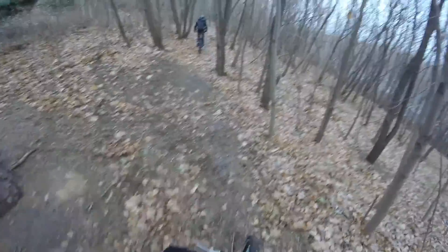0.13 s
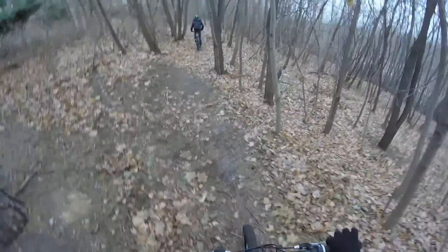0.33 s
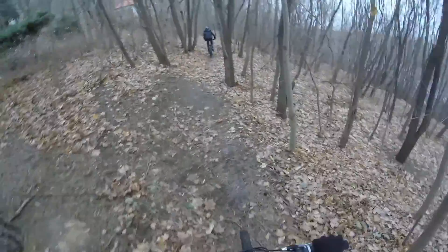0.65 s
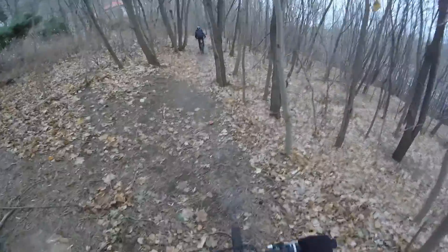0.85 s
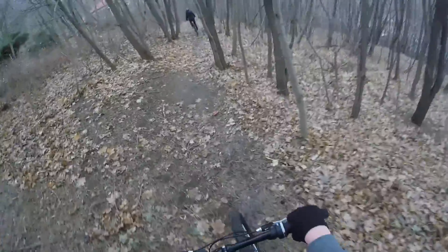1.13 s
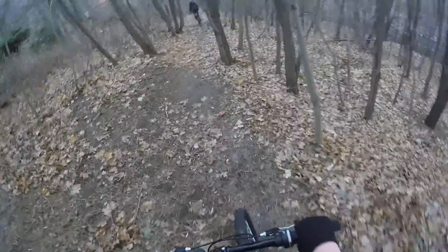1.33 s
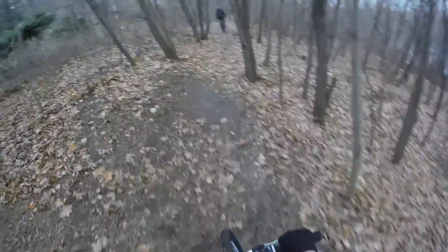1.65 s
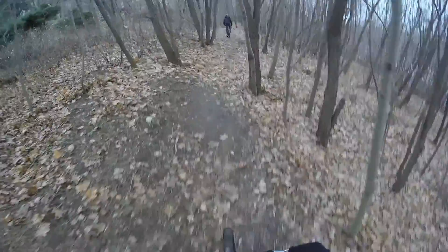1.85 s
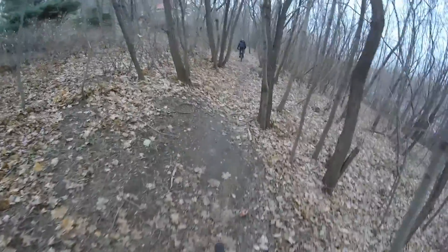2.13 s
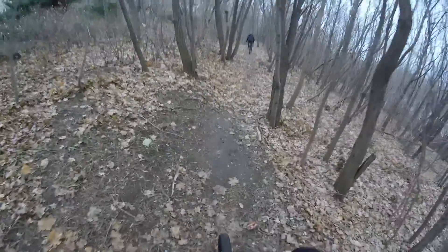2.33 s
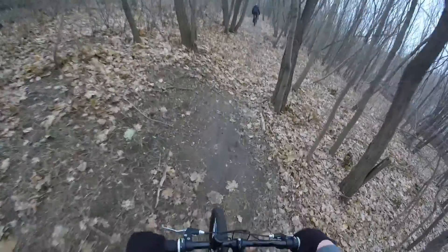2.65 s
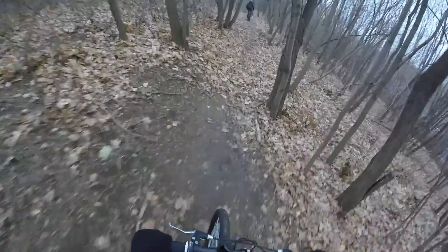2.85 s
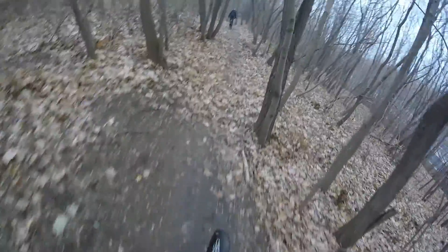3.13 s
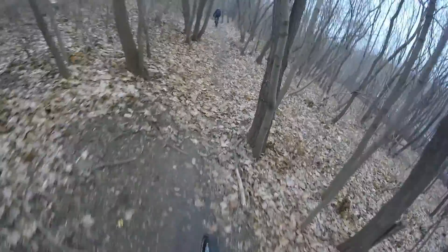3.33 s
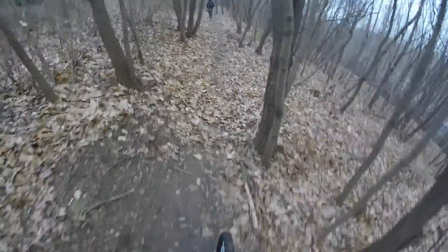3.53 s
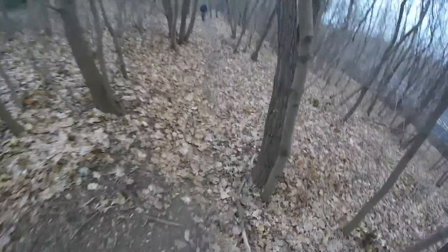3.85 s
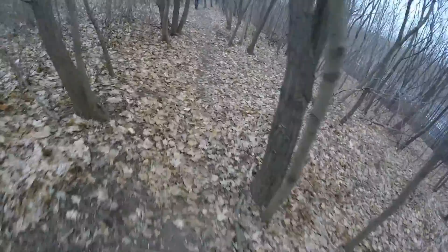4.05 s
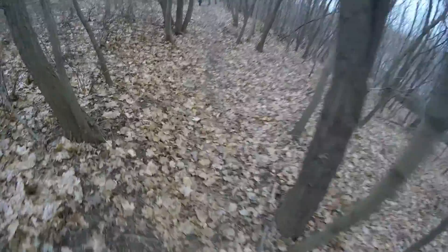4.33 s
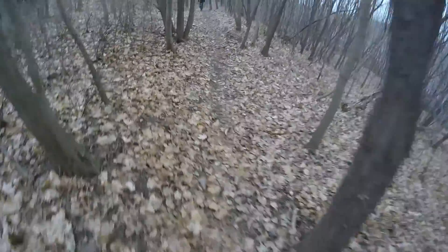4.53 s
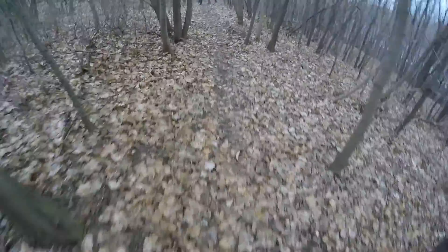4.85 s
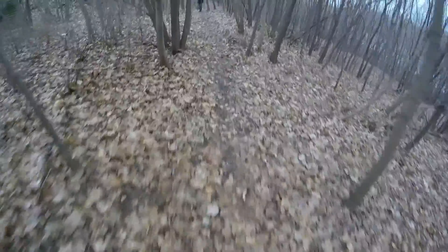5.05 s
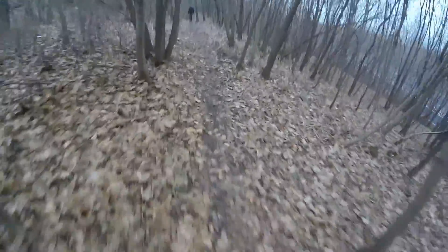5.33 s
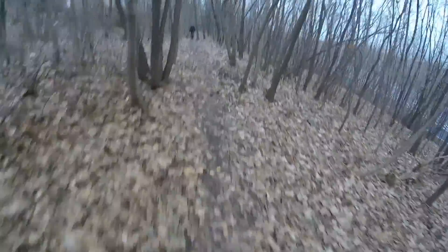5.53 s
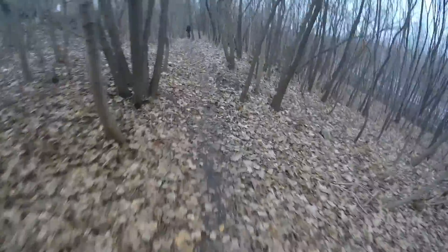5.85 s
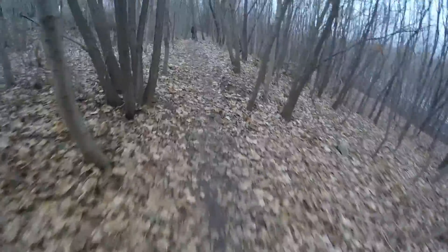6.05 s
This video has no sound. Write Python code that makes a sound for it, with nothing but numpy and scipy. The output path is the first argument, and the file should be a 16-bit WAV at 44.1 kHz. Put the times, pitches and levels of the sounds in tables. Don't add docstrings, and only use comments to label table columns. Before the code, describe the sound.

From inside a plastic camera case, a bike rumbles over forest ground, with buffeting wind, root thuds, small mount squeaks, and cracks near the start and five seconds.

```python
import sys
import numpy as np
from scipy import signal
from scipy.fft import rfft, irfft, next_fast_len
from scipy.io import wavfile
from scipy.ndimage import uniform_filter1d

SR = 44100
rng = np.random.default_rng(int(sys.argv[2]) if len(sys.argv) > 2 else 0)


def inscribe(sig):
    pcm = np.round(np.clip(np.atleast_2d(sig).T, -1, 1) * 32767)
    wavfile.write(sys.argv[1], SR, pcm.astype(np.int16))


def boost_factor(decibels):
    exponent = np.asarray(decibels, float) / 20
    return 10 ** exponent


N = 272979
T = np.arange(N) / SR

# pitch_hz, width_hz, level_db
CASE_RINGS = [(505, 270, -28.5), (1167, 35, -10.5), (1527, 140, -4.5), (1658, 98, -0.5), (2244, 97, -3.5),
              (2591, 217, -0.5), (2964, 180, -11.5), (3780, 300, -25), (6010, 1160, -27.5),
              (6510, 870, -30), (7890, 120, -26), (9500, 480, -34.5), (10400, 580, -35), (13900, 1300, -40)]
# freq_hz, level_db
CASE_WALL = [(100, -33.5), (700, -35.5), (2000, -10.5), (3500, -26.5), (5000, -31.5), (8500, -37.5),
             (12000, -67), (16000, -90)]

# centre_s, level_db
GUSTS = [(0.0, -48), (0.28, -46.5), (0.55, -46), (0.72, -45), (1.05, -62), (1.38, -52.5), (1.58, -59),
         (1.78, -52), (2.12, -56), (2.359, -47), (2.63, -46.5), (2.97, -46.5), (3.17, -45), (3.38, -49.5),
         (3.64, -44.5), (3.93, -48), (4.1, -47.5), (4.28, -51), (4.46, -48.5), (4.75, -52), (5.02, -46),
         (5.2, -40.5), (5.31, -41.5), (5.58, -42.5), (5.96, -46), (6.1, -47.5)]
# freq_hz, level_db
BUFFET_COLOUR = [(4, 5), (15, 9), (25, -4.5), (33, -6), (42, -4.5), (55, -9.5), (100, -56), (1000, -98)]
# freq_hz, level_db
DRUM_COLOUR = [(40, -23), (60, -1.5), (80, -1.5), (105, -4.5), (170, -3.5), (230, -16), (400, -31.5),
               (900, -53), (8000, -67)]
# freq_hz, level_db
AIR_COLOUR = [(120, -34.5), (200, -4), (381, -5), (870, -10.5), (1360, -6), (1520, 0.5), (1880, -8),
              (2640, -9.5), (3460, -18.5), (14500, -36)]

# start_s, length_s, drum_db, chain_db
PUSHES = [
    (-0.1, 0.17, -57, -81),
    (0.548, 0.78, -53.5, -93),
    (2.02, 0.68, -52, -82.5),
    (3.38, 0.67, -55, -103),
    (4.725, 0.78, -58, -87),
    (6.006, 0.5, -55.5, -93),
]

# start_s, level_db, pitch_hz
BUMPS = [(0.02, -40.5, 97), (0.265, -50, 60), (0.6, -32, 83.6), (1.918, -48.5, 79), (2.67, -37, 62.7),
         (3.059, -37.5, 76.1), (3.419, -52, 94.5), (3.801, -39, 80.8), (4.184, -38.5, 81.5),
         (4.751, -50, 171.8), (5.298, -39.5, 85.8), (6.036, -37, 76.4)]
# start_s, peak_db, pitch_hz
TICKS = [
    (1.4087, -57, 6350),
    (1.513, -58, 5940),
    (2.4703, -56, 6300),
    (3.4955, -62, 6170),
    (5.4301, -54.5, 6040),
    (2.0383, -62, 8900),
    (3.4116, -61, 8380),
]

# start_s, peak_db, low_ring_db, bright_db, swell_ms
KNOCKS = [
    (0.4669, -22.5, -21, -13, 1.32),
    (0.4736, -42, -18, -10, 2.5),
    (4.97, -40.5, -3, -22, 2.24),
    (5.008, -23, 3.5, -15.5, 1.96),
    (5.0119, -27.5, 4.5, -25, 1.94),
    (5.0428, -44.5, 6, -15, 2.5),
    (5.6407, -47, -14, -30, 1.8),
]
# pitch_hz, level_db
KNOCK_TONES = [
    [(2170, -8), (2560, -1.5), (2980, -4), (3300, -14.5), (3900, -17)],
    [(330, -21.5), (580, -26.5), (1120, -14.5), (1670, -1.5), (1910, -6.5)],
    [(5810, -1.5), (6170, 1.5), (7950, -37.5), (10100, -16), (14300, -17)],
]
# freq_hz, level_db
RATTLE_COLOUR = [(150, -17), (800, -1.5), (2500, 10.5), (5000, -3), (8000, -4.5), (12000, -17.5),
                 (16000, -14)]

# start_s, length_s, pressure_db, start_rate_hz, end_rate_hz
SLIPS = [(1.166, 0.028, -55.5, 444.7, 446), (1.207, 0.034, -48, 428.6, 444.3),
         (1.247, .02, -42, 536, 539.3), (1.258, .028, -41.5, 517, 514), (1.295, .021, -43.5, 518, 503),
         (1.323, 0.037, -38, 529, 515), (1.355, 0.015, -37.5, 534, 536), (1.375, 0.019, -53, 538.4, 530.8),
         (2.619, 0.017, -53.5, 504, 518), (2.643, 0.019, -42.5, 514.8, 512.8),
         (2.672, 0.038, -40, 519, 520.3), (2.698, .022, -37, 523, 530), (2.72, 0.017, -42.5, 526, 537),
         (2.729, 0.019, -47, 556.4, 572), (2.76, .02, -56.5, 530, 534), (3.835, 0.011, -54, 505, 493),
         (3.864, 0.0082, -51, 506, 495.4), (3.888, 0.041, -46.5, 506.7, 502),
         (3.944, 0.032, -49, 515, 531.6), (3.963, 0.047, -49.5, 548, 560), (4.943, 0.017, -51, 502, 515),
         (4.962, 0.05, -55, 568, 580)]
# pitch_hz, width_hz, level_db
SLIP_RINGS = [(1524, 350, -3), (2622, 134, -2)]
# freq_hz, level_db
SLIP_COLOUR = [(700, 9), (1050, -21), (1300, -3), (1600, -1.5), (1900, -11), (2150, -4.5), (2600, 1),
               (3100, -7), (3700, -15.5), (4500, -30)]
# multiple, level_db
SQUEAL_PARTIALS = [(4, -4), (4.2, -6), (5, 2), (6, -36), (7, -7), (8, -4), (9, -14), (10, -11), (11, -8),
                   (12, -19)]
# freq_hz, level_db
SCRAPE_COLOUR = [(3000, 4.5), (4500, -8), (7000, -6), (10000, -16), (12000, -15), (15600, -11),
                 (15900, -40)]

# time_s, level_db
TREAD_WEIGHT = [(0.0, -54), (0.5, -59.5), (0.62, -53), (1.0, -58), (1.45, -59), (1.69, -53), (1.97, -57),
                (2.08, -50.5), (2.85, -66), (3.08, -60), (3.3, -67.5), (3.5, -57), (4.08, -71.5),
                (4.3, -58), (4.6, -63), (5.1, -54.5), (5.8, -72), (6.19, -55)]
# entry_s, deepest_s, exit_s, depth_db
LEAF_DRIFTS = [
    (0.75, 0.977, 1.6, -82),
    (2.848, 2.995, 3, -85),
    (4.558, 4.7, 5.4, -70.5),
    (4.693, 5.053, 5.4, -64.5),
    (5.15, 5.42, 5.585, -70),
    (5.828, 5.91, 5.9, -81.5),
]
# pitch_hz, width_hz, level_db
HUB_BANDS = [(5550, 200, 0), (9480, 220, -4), (10070, 180, -5), (13400, 180, -9), (13950, 180, -9),
             (15080, 120, -12)]

# low_hz, high_hz, open_db (over the usual level of the band)
TOP_BANDS = [(14500, 15150, -1), (15150, 17500, 6)]


def unit(x):
    return x / np.sqrt(np.mean(x ** 2))


def noise():
    return rng.standard_normal(N)


def high(x, hz):
    return signal.sosfilt(signal.butter(2, hz, "high", fs=SR, output="sos"), x)


def shape(points, hz):
    f, db = np.transpose(points)
    return boost_factor(np.interp(np.log(hz + 1), np.log(f), db))


def peaks(modes, hz):
    return np.sqrt(sum(boost_factor(db) ** 2 / (1 + (2 * (hz - f) / w) ** 2) ** 2 for f, w, db in modes))


def colour(x, gain):
    size = 2 ** 15
    cep = irfft(np.log(gain(np.fft.rfftfreq(size, 1 / SR)) + 1e-9), size)
    cep[1:size // 2] *= 2
    cep[size // 2 + 1:] = 0
    return signal.fftconvolve(x, irfft(np.exp(rfft(cep)), size))[:N]


def walk(rate):
    k = int(SR / rate)
    held = np.repeat(rng.standard_normal(N // 50), k)[:N]
    return unit(uniform_filter1d(uniform_filter1d(held, k), k))


def rough(rate):
    return walk(rate) + 1j * walk(rate)


def crackle(rate, spread_db):
    snaps = (rng.random(N) < rate / SR) * boost_factor(spread_db * rng.exponential(size=N))
    smeared = signal.lfilter([1], [1, -np.exp(-1 / (0.0019 * SR))], snaps)
    return unit(smeared * noise())


def case_gain(hz):
    return np.hypot(peaks(CASE_RINGS, hz), shape(CASE_WALL, hz))


def pushes(column, sag_db_s, rest_db):
    attack_s, release_s = 0.044, 0.079
    power = boost_factor(rest_db) ** 2
    for row in np.array(PUSHES):
        age = T - row[0]
        gate = np.clip(np.minimum(age / attack_s, (row[1] - age) / release_s), 0, 1)
        power = power + (gate * boost_factor(row[column] - sag_db_s * np.clip(age, 0, 1))) ** 2
    return np.sqrt(power)


def wind():
    gust_s, lull_db, air_db = 0.076, -60, -59
    gust_power = sum(boost_factor(db) ** 2 * np.exp(-((T - s) / gust_s) ** 2) for s, db in GUSTS)
    gusts = np.sqrt(boost_factor(lull_db) ** 2 + gust_power)
    buffet = unit(colour(noise(), lambda hz: shape(BUFFET_COLOUR, hz))) * gusts
    drum = unit(colour(noise(), lambda hz: shape(DRUM_COLOUR, hz))) * boost_factor(1.9 * walk(14))
    drum = drum * pushes(column=2, sag_db_s=9, rest_db=-63)
    air = unit(colour(noise(), lambda hz: shape(AIR_COLOUR, hz))) * boost_factor(air_db + 0.6 * walk(6))
    return buffet + drum + air


def bumps():
    out = np.zeros(N)
    for s, db, hz in BUMPS:
        age = np.maximum(T - s, 0)
        swell = np.exp(-age / 0.021) * (1 - np.exp(-age / 0.011))
        out += boost_factor(db - 1.0) * np.sin(2 * np.pi * hz * age) * swell
    return out


def ticks():
    out, grit = np.zeros(N), high(noise(), 5000)
    for s, db, hz in TICKS:
        age = np.maximum(T - s, 0)
        ping = np.sin(2 * np.pi * hz * age) + 0.4 * grit
        out += (T > s) * boost_factor(db) * np.exp(-age / 0.0014) * ping
    return out


def knocks():
    tones, rattle = np.zeros(N), np.zeros(N)
    chance = rng.random((len(KNOCKS), 3, 5, 2))
    for (s, db, low_db, bright_db, ms), rows in zip(KNOCKS, chance):
        age = np.maximum(T - s, 0) * 1000 / max(ms, 0.5)
        near = (age > 0) & (age < 8)
        swell = age[near] ** 1.63 * np.exp(1 - age[near] ** 1.4)
        for group, group_db, row in zip(KNOCK_TONES, (0, low_db, bright_db), rows):
            for (hz, tone_db), (detune, turn) in zip(group, row):
                cycles = hz * (1 + 0.024 * (detune - 0.5)) * (T[near] - s) + 0.35 * turn
                tones[near] += boost_factor(db - 4.5 + tone_db + group_db) * swell * np.sin(2 * np.pi * cycles)
        rattle += boost_factor(db) * np.minimum(age * 3, 1) * (np.exp(-age / 2.12) + 0.096 * np.exp(-age / 6))
    rattle *= noise()
    cased = boost_factor(-3) * colour(rattle, case_gain)
    direct = boost_factor(-12) * colour(rattle, lambda hz: shape(RATTLE_COLOUR, hz))
    return tones + cased + direct


def pressure():
    attack_s, release_s, overlap_s = 0.01, 0.0089, 0.008
    growth_db = 1
    s, length, db, start_hz, end_hz = np.transpose(SLIPS)
    times = np.maximum.accumulate(np.ravel([s, s + length], "F"))
    hz = np.interp(T, times, np.ravel([start_hz, end_hz], "F"))
    press = np.zeros(N)
    for t0, t1, gain in zip(s - overlap_s, s + length + overlap_s, boost_factor(db + 45)):
        growth = boost_factor(growth_db * np.clip((T - t1) / (t1 - t0), -1, 0))
        gate = np.clip(np.minimum((T - t0) / attack_s, (t1 - T) / release_s), 0, 1)
        press = np.maximum(press, gain * growth * gate)
    return hz, press


def squeal(clean):
    turn = 2 * np.pi * np.cumsum(1297 * (1 + 0.00264 * walk(60))) / SR
    partials = (boost_factor(db) * np.real((clean + rough(300)) * np.exp(1j * k * turn))
                for k, db in SQUEAL_PARTIALS)
    return unit(sum(partials))


def mount():
    frame_db, frame_power, squeal_db, squeal_power = -60, 0.45, -66, 1.33
    off_ring_db = -7
    hz, press = pressure()
    jitter = 0.00706 * walk(450) / np.clip(press, 0.5, 2) ** 0.44
    phase = 2 * np.pi * np.cumsum(hz * (1 + 0.002 * walk(70) + jitter)) / SR
    slips = boost_factor(frame_db + 3.5) * press ** frame_power * np.cos(phase)
    for k in range(2, 9):
        ring = press * np.hypot(peaks(SLIP_RINGS, k * hz), boost_factor(off_ring_db))
        tint = shape(SLIP_COLOUR, k * hz)
        steady = 0.15 + 0.85 * tint ** 0.8
        tone = np.real((steady + 0.29 * rough(190)) * np.exp(1j * k * phase))
        slips += boost_factor(-42.5) * ring * tint * tone
    slips *= boost_factor(0.99 * walk(110))
    slips = 0.89 * slips + boost_factor(-0.5) * colour(slips, case_gain)
    scrape = unit(colour(noise(), lambda hz: shape(SCRAPE_COLOUR, hz)))
    rub = boost_factor(-1.0) * squeal(clean=1.2) + boost_factor(1.0) * scrape
    return slips + boost_factor(squeal_db) * press ** squeal_power * rub


def chain_and_hub():
    hub = unit(colour(noise(), lambda hz: peaks(HUB_BANDS, hz)))
    return hub * boost_factor(7.5) * pushes(column=3, sag_db_s=27, rest_db=-97)


def leaves():
    thin_db = -96.5
    drifts = [boost_factor(db) * np.interp(T, sorted([t0, t1, t2]), [0, 1, 0]) for t0, t1, t2, db in LEAF_DRIFTS]
    return np.sqrt(boost_factor(thin_db) ** 2 + np.sum(np.square(drifts), axis=0))


def tyres():
    split_hz = 1950
    weight_db, depth = np.interp(T, *np.transpose(TREAD_WEIGHT)), leaves()
    leaf_gain = boost_factor(-61) * (depth * boost_factor(83.5)) ** 0.48
    upper_gain = np.hypot(boost_factor(weight_db - 6), leaf_gain)
    crisp_gain = np.hypot(boost_factor(weight_db - 39), depth)
    tread = crackle(5000, spread_db=-1.5)
    low = unit(colour(tread * boost_factor(2.0 * walk(18)),
                      lambda hz: case_gain(hz) / np.hypot(1, (hz / split_hz) ** 6)))
    upper = unit(colour(tread * boost_factor(1.45 * walk(16)),
                        lambda hz: case_gain(hz) / np.hypot(1, (split_hz / (hz + 1)) ** 6)))
    leaf_snaps = high(crackle(4000, spread_db=1.0), 3960)
    crisp = unit(colour(leaf_snaps * boost_factor(1.5 * walk(14)), case_gain))
    return low * boost_factor(weight_db + 2.0) + upper * upper_gain + crisp * crisp_gain


def scene():
    return (wind() + bumps() + ticks() + knocks() + mount() + chain_and_hub() + tyres())[None]


def top_cut(x):
    return signal.sosfilt(signal.butter(12, 16530, fs=SR, output="sos"), x)


def record(dry):
    size = next_fast_len(N)
    spectrum, hz = rfft(dry, size), np.fft.rfftfreq(size, 1 / SR)
    kept = dry
    for low_hz, high_hz, open_db in TOP_BANDS:
        top = irfft(spectrum * (hz > low_hz) * (hz <= high_hz), size)[:, :N]
        power = uniform_filter1d(top ** 2, size=2048)
        shut = power < boost_factor(open_db) ** 2 * np.median(power)
        kept = kept - top * uniform_filter1d(1.0 * shut, size=512)
    return top_cut(kept)


dry = scene()
out = record(dry)
inscribe(out)
```